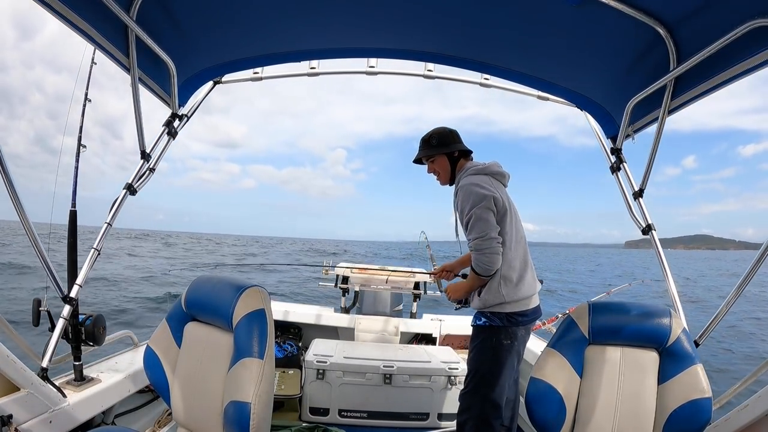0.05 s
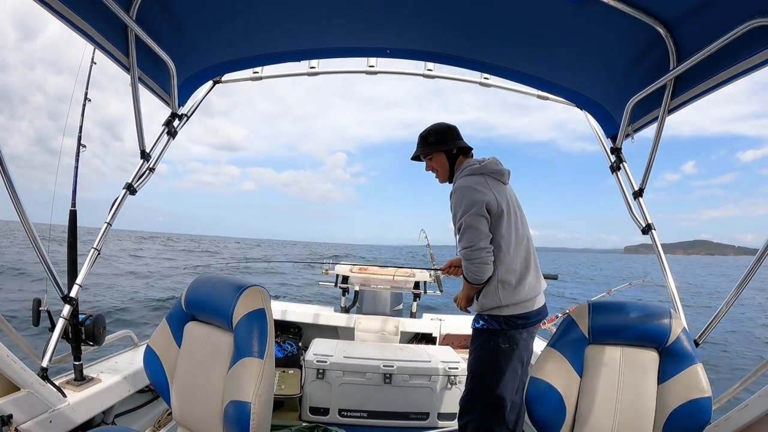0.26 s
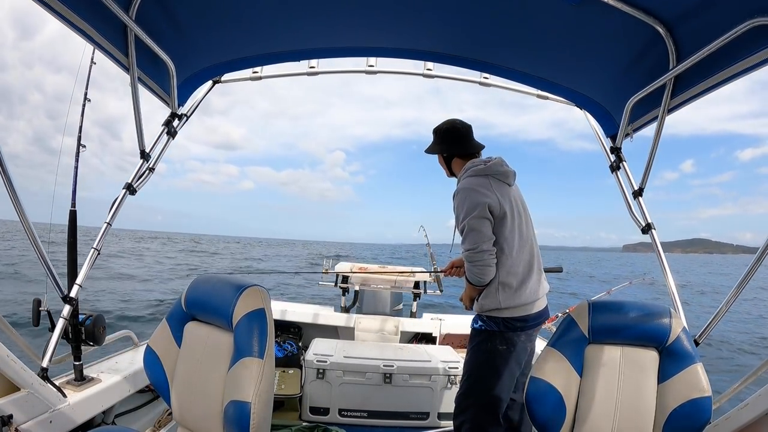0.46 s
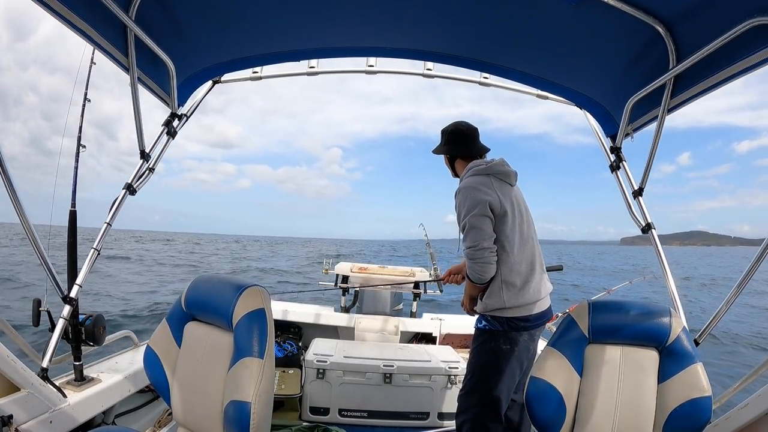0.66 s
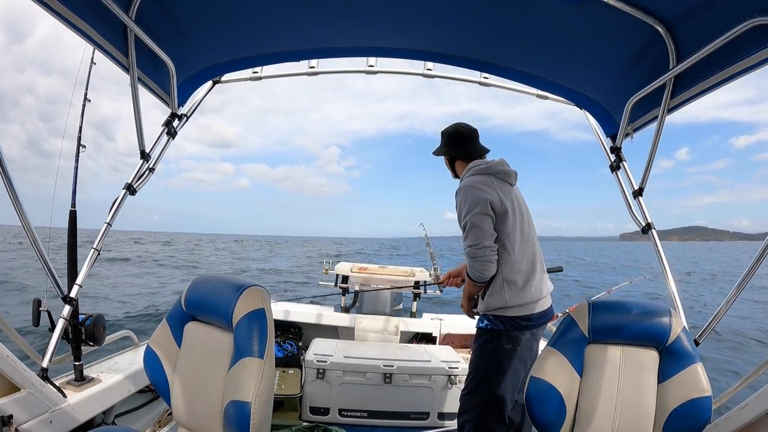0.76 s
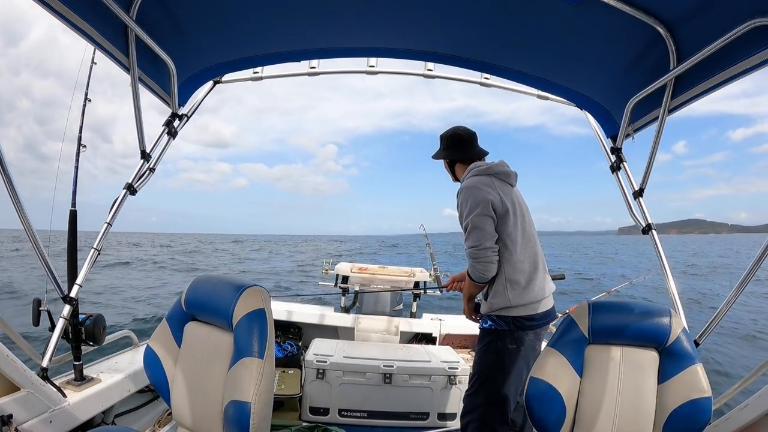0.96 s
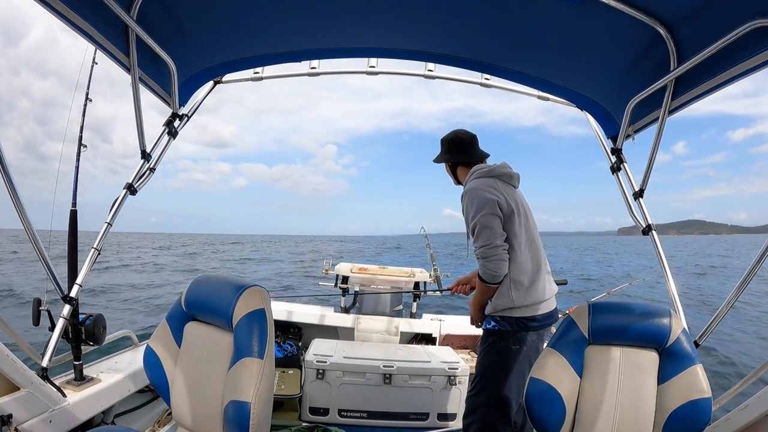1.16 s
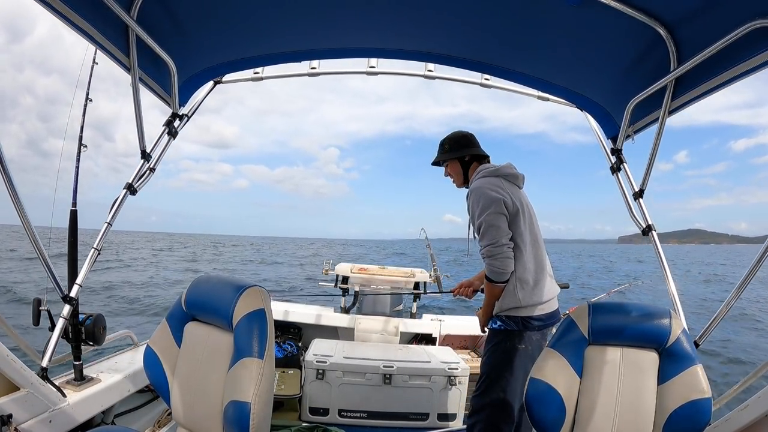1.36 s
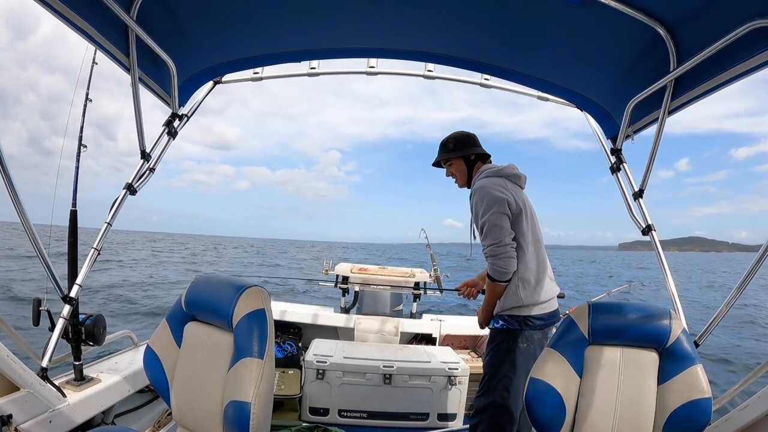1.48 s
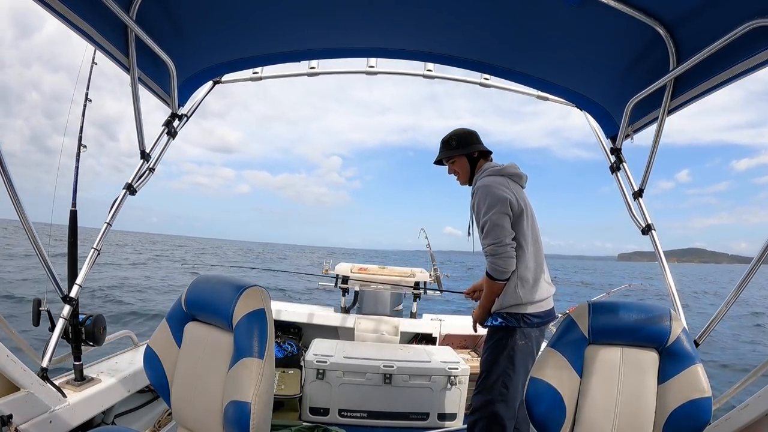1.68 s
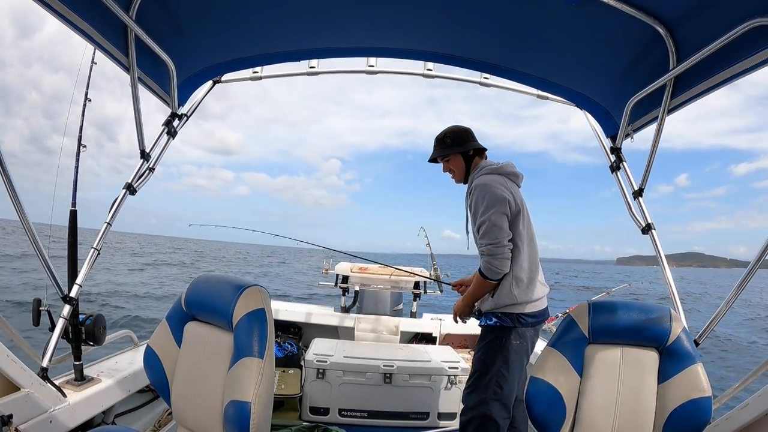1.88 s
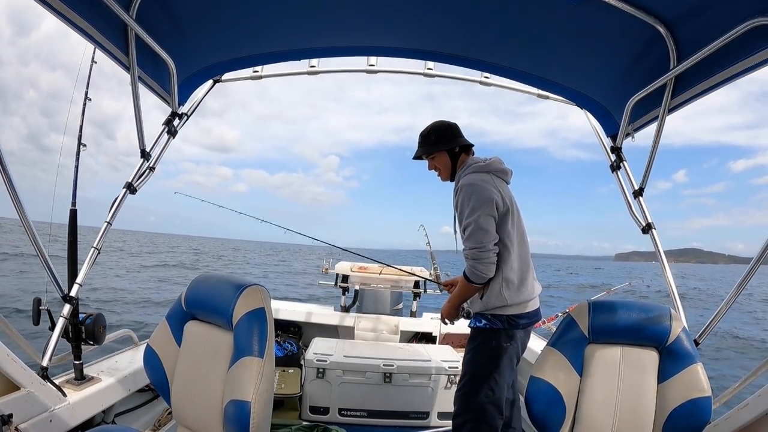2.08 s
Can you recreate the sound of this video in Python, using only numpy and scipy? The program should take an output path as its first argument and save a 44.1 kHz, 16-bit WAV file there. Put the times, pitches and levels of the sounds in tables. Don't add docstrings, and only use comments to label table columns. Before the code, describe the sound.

A landed fish flops on the floor of a small boat at sea, one loud wet whack early, then uneven low thumps, slaps and slithers, picked up close by a camera fixed to the hull.

```python
import sys
import numpy as np
from scipy import signal
from scipy.fft import rfft, irfft
from scipy.io import wavfile
from scipy.ndimage import uniform_filter1d

SR = 44100
rng = np.random.default_rng(int(sys.argv[2]) if len(sys.argv) > 2 else 0)


def invert_db(level):
    return 10 ** (np.asarray(level, dtype=float) / 20)


def int16_out(signal):
    q = np.round(np.clip(np.atleast_2d(signal).T, -1, 1) * 32767)
    wavfile.write(sys.argv[1], SR, q.astype(np.int16))


N = 94065
T = np.arange(N) / SR


def unit(x):
    return x / np.sqrt(np.mean(x ** 2))


def colour(x, points):
    hz, db = np.array(points, float).T
    f = np.maximum(np.arange(N // 2 + 1) * SR / N, 1)
    gain = invert_db(np.interp(np.log(f), np.log(hz), db))
    return irfft(rfft(x) * gain, N)


def ring(x, hz, width_hz):
    centre_hz = min(hz, 0.45 * SR)
    q = max(hz / width_hz, 0.5)
    return signal.lfilter(*signal.iirpeak(centre_hz, q, fs=SR), x)


def walk(rate_hz):
    k = max(int(SR / rate_hz), 2)
    smooth = uniform_filter1d(rng.standard_normal(N), k)
    return unit(uniform_filter1d(smooth, k))


def burst(start_s, rise_s, t60_s):
    t = np.maximum(T - start_s, 0)
    rise = 1 - np.exp(-t / max(rise_s, 1e-4))
    return rise * np.exp(-np.log(1000) * t / max(t60_s, 0.01))


def swell(t, rise_s, order):
    return (t / rise_s / order) ** order * np.exp(order - t / rise_s)


def pair():
    return rng.standard_normal((2, N))


def coloured(noise, points):
    return unit(np.array([colour(n, points) for n in noise]))


# f/Hz, level/dB [per Hz]
RUMBLE_COLOUR = [(12, -25), (20, -9.5), (43, 2), (70, 3), (111, -21.5), (189, -25.5), (400, -32),
                 (520, -50), (880, -120)]
# f/Hz, level/dB [per Hz]
SEA_COLOUR = [(180, -17), (300, -6), (635, -0.5), (1420, -25.5), (1850, -21), (8300, -38.5), (10800, -74),
              (18300, -120)]


def sea():
    rumble = coloured(pair(), RUMBLE_COLOUR) * invert_db(-34)
    hiss = coloured(pair(), SEA_COLOUR) * invert_db(-55 + 2.0 * walk(5.1))
    return rumble + hiss


# t/s, level/dB
DRAG = [(0, -36), (.2, -35.5), (.35, -42), (0.551, -60), (.72, -44.5), (.97, -48), (1.12, -37.5),
        (1.29, -46), (1.42, -74), (1.551, -25.5), (1.72, -37), (1.8, -42.5), (1.921, -58), (2.03, -48),
        (2.13, -44)]
# f/Hz, level/dB [per Hz]
DRAG_COLOUR = [(150, 16.5), (300, 3), (700, 3), (1500, -8), (3000, -16), (7000, -25.5), (9000, -34),
               (15000, -51)]


def slither():
    s, db = np.array(DRAG).T
    patchy_db = 2 * walk(49)
    return coloured(pair(), DRAG_COLOUR) * invert_db(np.interp(T, s, db) + patchy_db)


def squeak():
    hz, width_hz = 7450, 600
    puff = pair() * burst(1.474, rise_s=0.0036, t60_s=0.06)
    return invert_db(-33) * 5 * ring(ring(puff, hz, width_hz), hz, width_hz)


# t/s, peak level/dB, f/Hz, t60/s
PLATE_PINGS = [(0.1333, -30.5, 1520, 0.024), (0.381, -40, 1724, 0.045), (0.4829, -34, 1700, 0.045),
               (0.574, -47, 1480, 0.033), (.5955, -18.5, 700, 0.015), (.601, -21, 597, 0.032),
               (.603, -27, 381, .12), (0.607, -25.5, 1095, 0.027), (0.64, -36.5, 1610, 0.059),
               (0.6641, -28, 1744, 0.065), (.667, -40, 2640, 0.052), (0.675, -29.5, 1356, 0.061),
               (0.878, -36, 1470, 0.045), (.808, -43.5, 5370, .04), (1.2226, -36, 1830, .04),
               (1.3155, -38.5, 745, 0.027), (1.435, -32, 1670, 0.019), (1.496, -37, 3170, 0.024),
               (1.5025, -36, 2040, 0.025), (1.528, -36, 3230, 0.026), (1.545, -33, 279.5, 0.28),
               (1.5631, -21, 1490, 0.016), (1.5671, -21, 1167, 0.029), (1.617, -25, 990, 0.023),
               (1.631, -38, 3700, 0.028), (1.66, -28, 1510, 0.019), (1.698, -26, 1285, 0.019),
               (1.706, -32, 1080, .03), (1.715, -25, 272, 0.12), (1.788, -26.5, 213.6, 0.27),
               (1.832, -32.5, 552, .2), (1.854, -24, 376, 0.14), (1.857, -29.5, 920, 0.035),
               (1.94, -26, 152, 0.16), (1.985, -51, 1830, 0.12), (2.051, -53, 3400, 0.027),
               (2.064, -43.5, 1980, 0.067), (2.104, -48.5, 3430, 0.038)]


def pings():
    out = np.zeros(N)
    for s, db, hz, t60 in PLATE_PINGS:
        rise_s = 0.6 / hz
        out += invert_db(db) * burst(s, rise_s, t60) * np.sin(2 * np.pi * hz * (T - s))
    return np.array([out, 0.33 * out])


# t/s, peak level/dB, centre f/Hz, t60/s
FIN_KNOCKS = [(0.1321, -17, 1286, 0.056), (0.384, -37, 1740, 0.049), (0.4813, -34, 1690, 0.048),
              (0.571, -42, 1360, 0.022), (0.595, -24.5, 1115, 0.19), (0.6646, -17, 1380, 0.11),
              (0.8085, -32.5, 1670, 0.08), (0.8778, -33.5, 1300, 0.099), (0.9048, -31.5, 1760, 0.052),
              (1.0136, -25.5, 1830, 0.062), (1.2231, -29, 1780, 0.098), (1.3227, -28, 1085, 0.057),
              (1.4361, -30, 1470, 0.084), (1.4952, -34.5, 3010, 0.092), (1.502, -33, 1866, 0.25),
              (1.53, -41, 1120, 0.22), (1.5648, -20, 1300, 0.091), (1.6152, -24, 1260, 0.17),
              (1.6583, -30, 1360, 0.058), (1.697, -31, 1280, 0.045), (1.8604, -26.5, 1030, 0.059),
              (2.0626, -34, 1280, 0.18)]
# t/s, peak level/dB, centre f/Hz, t60/s
FURTHER_KNOCKS = [(.008, -22, 763, 0.19), (0.067, -23, 418, 0.21), (0.206, -22, 1690, 0.19),
                  (0.241, -21, 1070, 0.13), (0.448, -42, 6000, 0.056), (.809, -37.5, 5000, 0.052),
                  (1.058, -47.5, 3400, 0.19), (1.086, -27.5, 1620, 0.074), (1.1, -29, 1320, 0.24),
                  (1.124, -32, 926, 0.47), (1.164, -29, 640, 0.27), (1.472, -42, 11740, 0.082),
                  (1.682, -33.5, 3360, 0.05), (1.856, -25, 534, 0.18), (1.985, -42.5, 1820, 0.097)]


def knocks():
    q, rise_s = 5, 0.001016
    noise, out = pair(), 0
    for s, db, hz, t60 in list(FIN_KNOCKS) + list(FURTHER_KNOCKS):
        hit = noise * burst(s, rise_s, t60)
        hit[0, int((s + rise_s) * SR)] += invert_db(16) * np.sqrt(2000 / hz)
        rung = ring(ring(hit, hz, hz / q), hz, hz)
        out = out + invert_db(db - 4) * rung * np.sqrt(SR * q / hz) / 3
    return out


def spray(x):
    z = signal.stft(x, nperseg=256)[2]
    patches = uniform_filter1d(rng.standard_normal(z.shape[1:]), size=3, axis=0)
    patches = unit(uniform_filter1d(patches, size=2, axis=1))
    return signal.istft(z * invert_db(2 * patches), nperseg=256)[1][:, :N]


# t/s, peak level/dB, t60/s, rise/s, treble level/dB
TAIL_SLAPS = [(0.0014, -32.5, 0.28, 0.0035, -3), (0.132, -59, 0.53, 0.0044, 1),
              (0.4224, -45, 0.26, 0.0016, 3), (0.4454, -33.5, 0.21, 0.0088, 10.5),
              (0.4634, -48.5, 0.48, 0.0017, -10.5), (0.5904, -23.5, 0.18, 0.011, 7),
              (0.6175, -25, 0.11, 0.001, -0.5), (0.6621, -30, 0.11, 0.0022, -6.5),
              (0.8066, -42.5, 0.2, 0.00061, -8), (0.8744, -47.5, 0.2, 0.00084, -2.5),
              (0.9018, -36.5, 0.14, 0.0019, 0), (1.0121, -24, 0.13, 0.0012, 3),
              (1.22, -34.5, 0.17, 0.0016, 5.5), (1.497, -51, 0.71, 0.01, -1),
              (1.561, -43.5, 0.54, 0.00068, -10.5), (1.781, -32.5, 0.27, 0.0027, 0.5),
              (1.7953, -31, 0.13, 0.0021, -0.5), (1.8537, -42.5, 0.29, 0.0015, 3)]
# t/s, peak level/dB, t60/s, rise/s, treble level/dB
FIN_FLICKS = [(0.3804, -46, 0.35, 0.005, -3.5), (0.5717, -51, 0.088, 0.0011, -1),
              (1.085, -45, 0.096, 0.0039, -3), (1.132, -44, 0.18, 0.0045, -8),
              (1.1844, -38, 0.33, 0.0038, -0.5), (1.314, -43.5, 0.32, 0.0037, 1.5),
              (1.3797, -48.5, 0.32, 0.0048, 10.5), (1.451, -38.5, 0.51, 0.0044, 1),
              (1.535, -36, 0.16, 0.011, -6), (1.681, -48.5, 0.22, 0.0056, 10.5),
              (2.0507, -40, 0.36, 0.0052, 4.5), (2.1027, -38, 0.17, 0.0024, 6.5)]
# f/Hz, level/dB [per Hz]
SPLAT_COLOUR = [(250, -14), (500, -1), (1100, -3.5), (3300, -9.5), (7800, -17.5), (8700, -24.5),
                (12000, -27.5), (15800, -62)]
# t/s, peak level/dB, t60/s, rise/s
BODY_WHACK = [
    (0.1974, -6, 0.093, 0.00021),
    (0.201, -18, 0.15, 0.015),
]
# f/Hz, level/dB [per Hz]
BODY_WHACK_COLOUR = [(300, -10), (1100, -1), (8000, -10), (8700, -26), (15800, -47)]


def slaps():
    low = high = 0
    for s, db, t60, rise, treble_db in list(TAIL_SLAPS) + list(FIN_FLICKS):
        low = low + invert_db(db - treble_db) * burst(s, rise, t60)
        high = high + invert_db(db + treble_db) * burst(s, rise, t60 * 0.67)
    noise = pair()
    splat = coloured(spray(noise), SPLAT_COLOUR)
    dull = signal.lfilter(*signal.butter(1, 3860, fs=SR), splat)
    bright = splat - dull
    whack_envelope = sum(invert_db(db) * burst(s, rise, t60) for s, db, t60, rise in BODY_WHACK)
    whack = coloured(noise, BODY_WHACK_COLOUR) * whack_envelope
    flicker = invert_db(2.5 * walk(130))
    grain = invert_db(-0.5 + 2.2 * walk(1200))
    return (dull * low + bright * high * flicker + whack) * grain / 2


# t/s, knock peak level/dB, knock f/Hz, boom level/dB re knock, panel level/dB re knock
BODY_BLOWS = [(-.021, -21, 87, 5.5, 6.5), (0.074, -30, 86, 8, 7.5), (0.1283, -10, 96, -5.5, -27),
              (0.201, -31, 105, 9, 9.5), (0.328, -17, 88, -2.5, -31.5), (0.462, -19.5, 74.6, 0.5, -42),
              (0.493, -27, 71, -9.5, -23), (0.521, -41, 101, -13, -21), (0.5943, -13, 92, -10, -9.5),
              (0.615, -20, 90, -27, -18), (0.6621, -7.5, 103.7, -11.5, -15), (0.685, -18.5, 95, -0.5, -12),
              (0.721, -18, 102, -11, -17), (0.791, -26.5, 75, 2.5, -12), (0.868, -20.5, 77.5, -4.5, -17.5),
              (1.004, -16.5, 143, -3, -8), (1.163, -26, 89, 0.5, -3.5), (1.237, -28.5, 90, -5, -19),
              (1.317, -10, 93.4, -1, -16.5), (1.405, -28.5, 105, -4, -22), (1.5166, -9, 96.6, -5.5, -13),
              (1.599, -13, 83, 0.5, -9), (1.693, -22.5, 82.5, -4, -7.5), (1.724, -26.5, 68, 0, -12),
              (1.7645, -11.5, 91, -8, -18), (1.8545, -9, 86.4, -3, -9), (1.934, -18.5, 67.3, -1, -17.5),
              (1.972, -25, 68, 4.5, -29.5), (2.0533, -12.5, 92, -3.5, -27.5), (2.112, -22, 97.6, -2, -22)]
# f/Hz, bandwidth/Hz, level/dB
PANEL_MODES = [(136.3, 40.6, 0), (186.1, 26.3, -3.5), (265.6, 37.7, -5), (308.3, 115, -8),
               (434.3, 105, -15), (558, 300, -27)]


def panels():
    envelope = 0
    for s, db, _, _, rattle_db in BODY_BLOWS:
        envelope = envelope + invert_db(db + rattle_db) * burst(s + 0.0016, rise_s=0.00086, t60_s=0.21)
    shake, out = envelope * pair(), 0
    for hz, width_hz, db in PANEL_MODES:
        rung = ring(ring(shake, hz, width_hz), hz, 2 * width_hz)
        out = out + invert_db(db) * rung * np.sqrt(SR / width_hz) / 8
    return 4 * out


def hull():
    boom_lag_s, boom_rise_s = 0.01048, 0.016
    start_hz, end_hz, sag_s = 55.1, 28.7, 0.057
    out = np.zeros(N)
    for s, db, hz, boom_db, _ in BODY_BLOWS:
        t = np.maximum(T - s, 0)
        knock = swell(t, 0.0036 * 90 / hz, order=3) * np.sin(2 * np.pi * hz * t)
        late = np.maximum(t - boom_lag_s, 0)
        turns = end_hz * late + (start_hz - end_hz) * sag_s * (1 - np.exp(-late / sag_s))
        boom = swell(late, boom_rise_s, order=1) * np.sin(2 * np.pi * turns)
        out -= invert_db(db) * (knock + invert_db(boom_db) * boom)
    return out


def scene():
    mid, other = sea() + slither() + squeak() + pings() + knocks() + slaps() + panels()
    mid = mid + hull()
    lean = np.tanh(np.log(invert_db(2.5)) / 2)
    treble_side = invert_db(-11) * other + lean * mid
    side = signal.lfilter(*signal.butter(2, 305, "high", fs=SR), treble_side)
    side = side + invert_db(-19.5) * other
    return np.array([mid + side, mid - side])


def roll_off(x):
    return signal.sosfilt(signal.butter(12, 15600, fs=SR, output="sos"), x)


def record(dry):
    return roll_off(dry)


dry = scene()
out = record(dry)
int16_out(out)
```